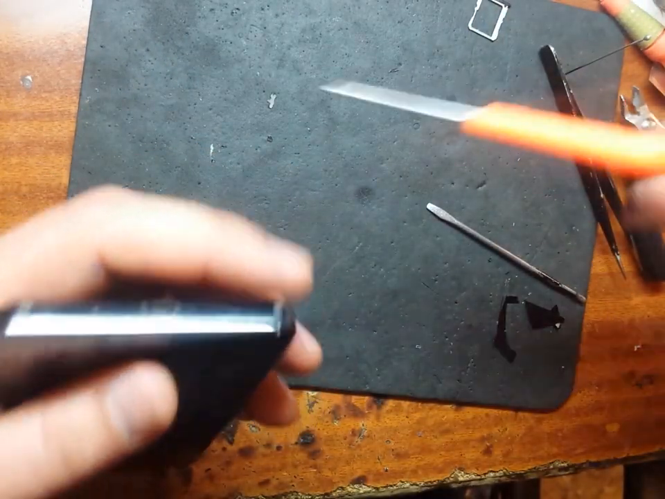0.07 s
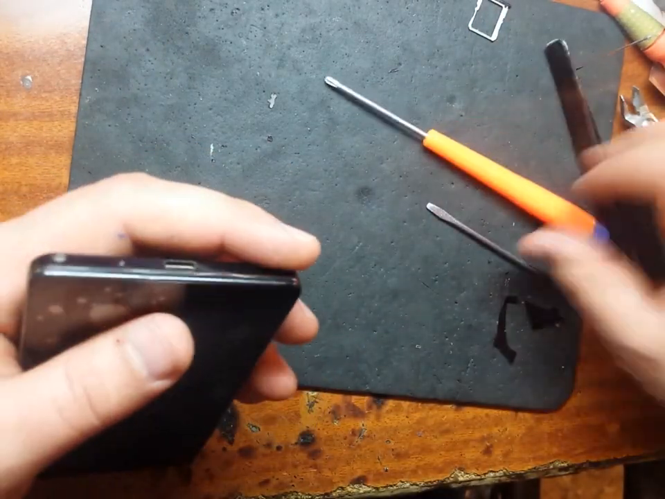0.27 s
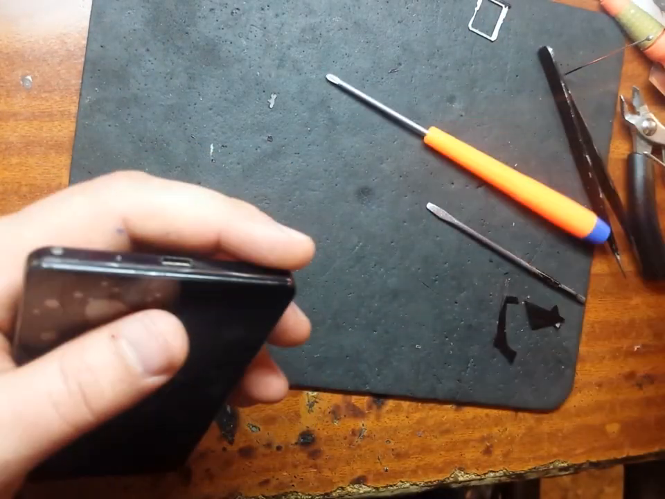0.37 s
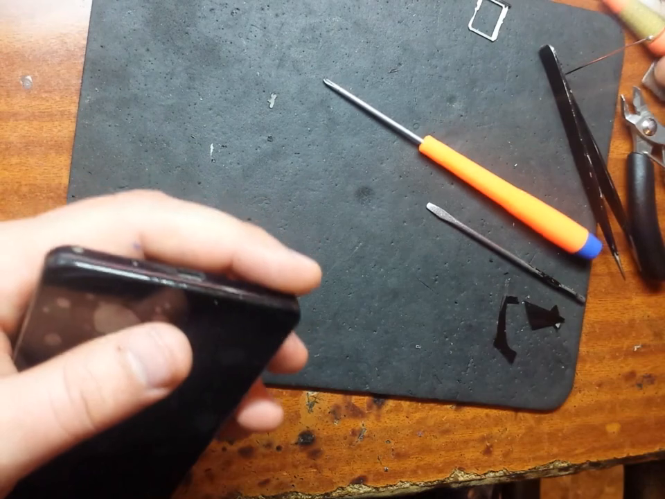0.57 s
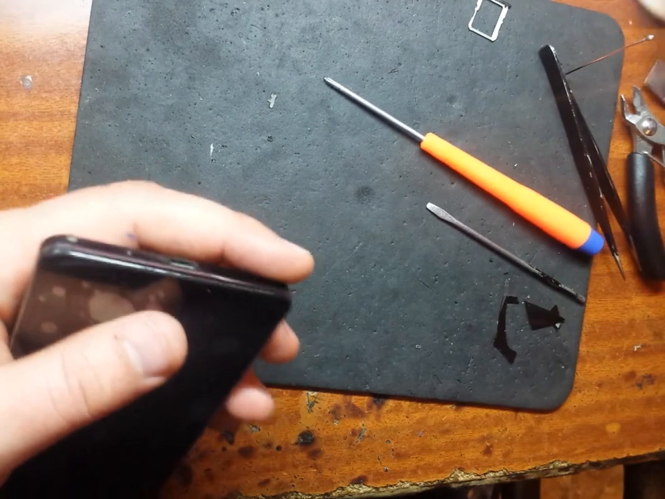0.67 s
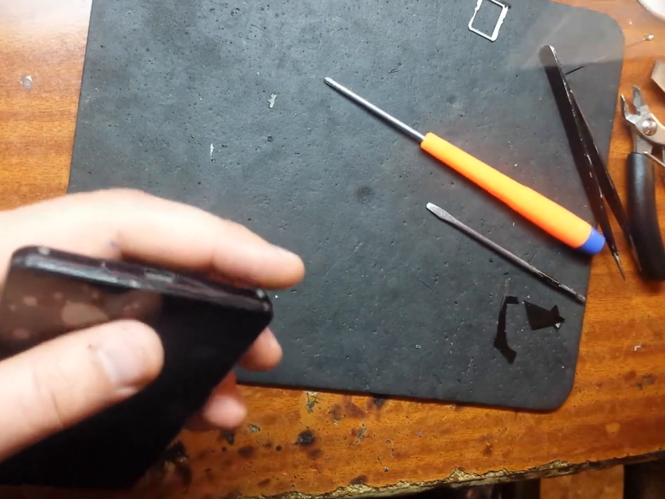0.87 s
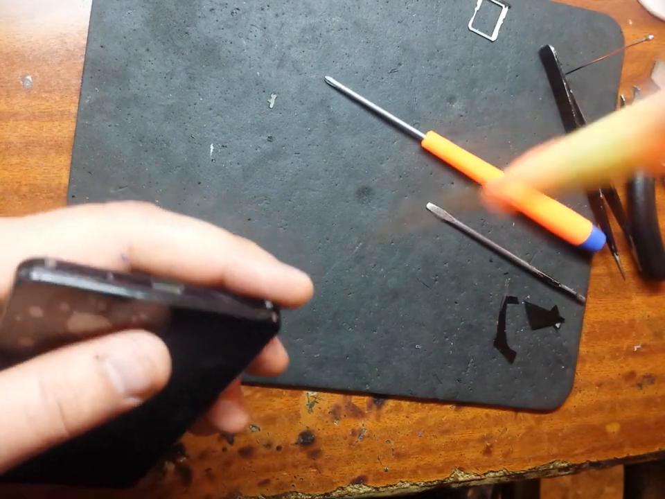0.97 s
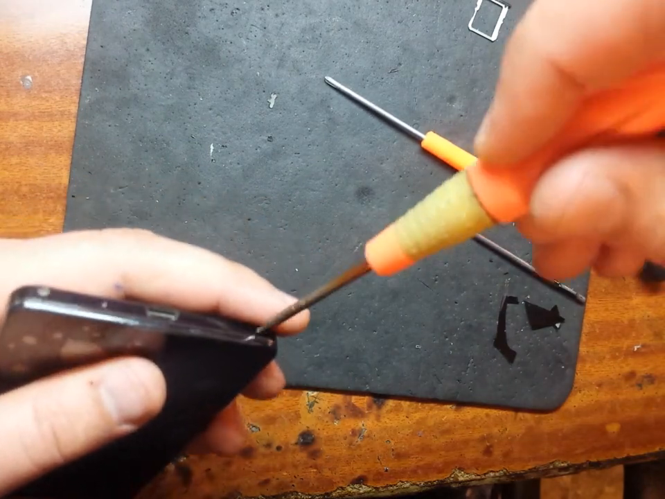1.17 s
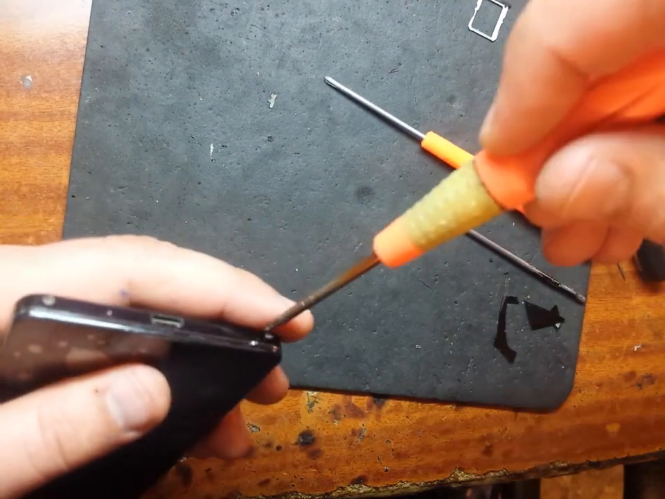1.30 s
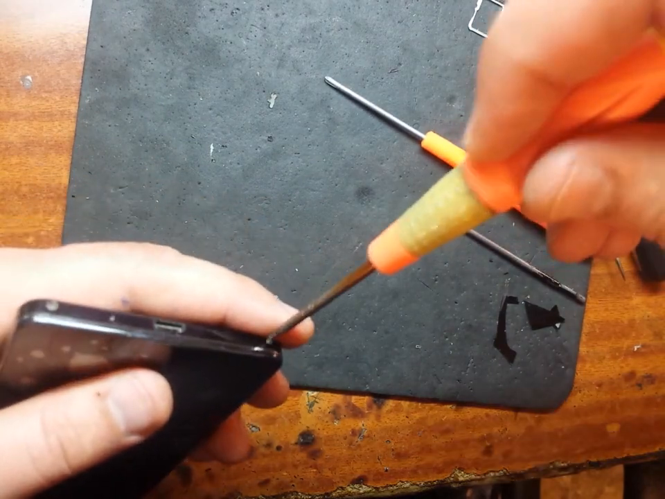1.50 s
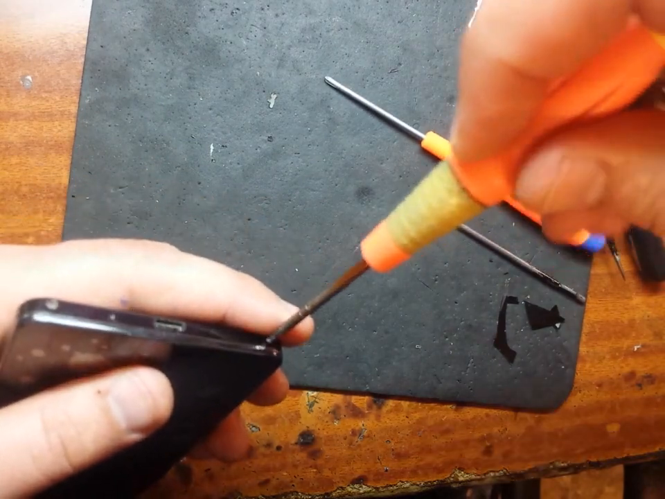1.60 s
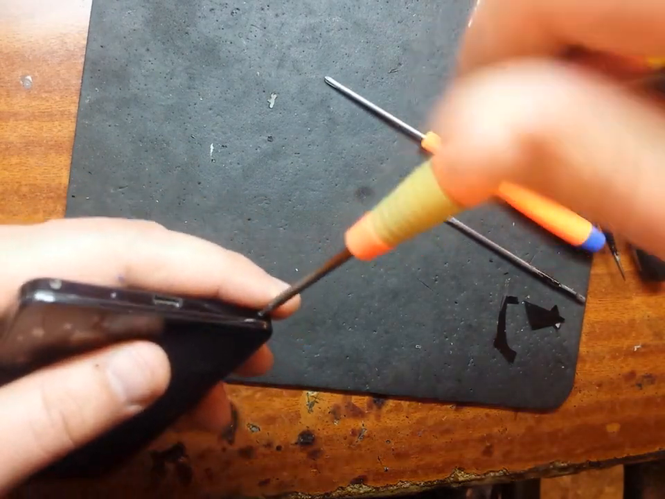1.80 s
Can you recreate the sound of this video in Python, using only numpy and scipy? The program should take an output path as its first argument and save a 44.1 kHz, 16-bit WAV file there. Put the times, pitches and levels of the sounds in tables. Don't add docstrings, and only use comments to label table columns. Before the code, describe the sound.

Small screwdrivers clatter on a rubber-matted wooden bench. Faint ticks lead to a bright steel tick at 0.23 seconds and a loud plastic clack with a soft thud at 0.33. After a lull, clacks, very sharp metallic snaps and short scrapes cluster from 0.6 to 0.78, then thick handle knocks at 0.8. Quiet room hiss remains, with tiny ticks near 1.25 and 1.75. Close, dry, small room.

```python
import sys
import numpy as np
from scipy import signal
from scipy.io import wavfile
from scipy.ndimage import uniform_filter1d, minimum_filter1d

SR = 44100
rng = np.random.default_rng(int(sys.argv[2]) if len(sys.argv) > 2 else 0)


def bounce(signal):
    frames = np.transpose(np.atleast_2d(signal))
    limited = np.clip(frames, -1, 1)
    pcm = np.round(limited * 32767).astype(np.int16)
    wavfile.write(sys.argv[1], SR, pcm)


def amplitude_ratio(level_db):
    exponent = np.asarray(level_db, float) / 20
    return 10 ** exponent


N = 81585

# start_s, peak_db, centre_khz, chatter_s
STEEL_HITS = [(0.0963,-30,5.8,0.003),(0.1673,-30,5.6,0.00087),(.226,-22.5,3.1,0.002),(0.2294,-10.5,8.7,0.0024),(0.2344,-22.5,5.3,0.0038),(0.293,-36.5,6.9,0.0027),(0.392,-25.5,6,0.0016),(0.542,-35,2,.003),(0.6958,-7,3.25,0.0025),(0.6985,-6.5,4.8,0.0026),(.7346,-15.5,4,0.002),(.924,-41,2.4,0.0016)]
# pitch_hz, level_db, t60_s (time to fall 60 dB)
STEEL_MODES = [(2430,-8,0.011),(3530,3,0.0095),(4020,0,0.016),(4750,-5.5,0.012),(5460,-4,0.012),(5890,0.5,0.022),(8700,4.5,0.0089),(10090,-1,0.0055),(11740,3,0.01),(12200,1,.006)]
# start_s, peak_db, centre_khz, chatter_s
HANDLE_HITS = [
    (.3264,-3,5,0.0037),
    (.328,-7.5,10.4,0.0015),
    (0.6043,-3,3.36,0.0083),
    (.609,-14,4.4,.004),
    (.613,-9,2.3,0.0086),
    (.617,-8,1.63,0.0071),
    (.635,-19.5,2,0.0027),
]
# pitch_hz, level_db, t60_s
HANDLE_MODES = [(350,12.5,0.037),(530,3,0.044),(744,-7.5,0.028),(1460,-1.5,0.022),(1637,-3,0.02),(2494,3,0.013),(2710,2,0.015),(3010,0.5,0.012),(3444,2,0.013),(4190,2,0.0078),(5480,-6,0.012),(5820,-11,0.023),(8750,-3.5,0.0057)]
# start_s, peak_db, centre_khz, chatter_s
GRIP_HITS = [
    (.7965,-14.5,1,0.0023),
    (.8018,-6.5,3.33,0.0047),
    (.8022,-11,.8,0.0032),
    (.8045,-10,1.36,0.0033),
    (.8294,-13,2.23,0.0034),
    (.831,-15.5,1.15,0.006),
    (.836,-24,0.66,0.008),
    (.848,-27,1,0.0053),
]
# pitch_hz, level_db, t60_s
GRIP_MODES = [(334,0.5,0.067),(380,-4,0.047),(545,2,0.095),(746,-0.5,0.06),(1092,-4.5,0.038),(1320,-0.5,0.041),(1630,-2.5,0.023),(1947,-7.5,0.031),(2220,-4.5,0.015),(2584,0.5,0.014),(3080,2.5,0.0082),(5500,-8,0.0074)]
# start_s, peak_db, centre_khz, chatter_s
TIP_HITS = [(0.3596,-19,8.1,0.0044),(.3695,-26,7,.004),(0.395,-21,6.9,.005),(0.6979,2,8.4,0.00092),(0.7325,-2.5,7.6,0.00063),(0.7504,-9,2.6,0.0025),(0.7629,-8.5,5.5,.0008),(.7665,-14,4.7,.003),(.772,-21,6.5,.002),(0.778,-24,4.7,0.0024),(1.035,-48,9,.003),(1.247,-29.5,11.3,0.0012),(1.593,-39,6.3,.005),(1.68,-44,9,.005),(1.745,-31.5,6,0.0022)]
# pitch_hz, level_db, t60_s
TIP_MODES = [(3270,-3,0.0057),(4020,8.5,0.0038),(5420,2.5,0.01),(5970,-3.5,0.0035),(7400,-7,.004),(8350,-1,0.003),(11940,-5.5,0.0069),(13400,2,0.0037)]

LEFT_RIGHT_DB = (8.1, 4.6, 4.6, 5.6)
CRACK_OVER_RING_DB = (0, 5.5, 1, 10)
CRACK_WIDTH_OCT = (0.99, 0.91, 1.05, 1.4)
AFTER_CONTACT_DB = (-1, -3.5, -4, -7.5)

# start_s, level_db, push_s
THUDS = [
    (0.228, -20, 0.0031),
    (.327, -19, 0.0023),
    (.334, -13.5, .002),
    (.738, -34, 0.0012),
    (0.614, -49, 0.0017),
    (0.803, -29.5, 0.00072),
]
# pitch_hz, level_db, t60_s
BENCH_MODES = [(99, -24, .15), (133, -6, 0.35), (170, -6.5, 0.16), (215, -7.5, .12), (328.5, -1, 0.168),
               (382.5, 1.5, 0.086), (732, 3, 0.044)]
# start_s, length_s, level_db, centre_khz, width_octaves
DRAGS = [
    (0.326,0.12,-32.5,4,1.24),
    (.357,0.02,-29.5,8.5,0.69),
    (.392,0.021,-41,6.9,1),
    (0.64,0.19,-33,1.42,1.35),
    (0.7335,0.063,-23.5,2.55,1.12),
    (0.82,0.11,-31.5,0.64,1.46),
    (0.8,0.039,-29,0.46,1.3),
    (.608,0.097,-35,1.55,1.28),
    (0.66,0.037,-35.5,0.29,1.03),
]
# start_s, length_s, level_db, centre_khz, width_octaves
RUBS = [
    (.53,.08,-43,8,1.4),
    (1.67,.15,-59,5.6,.45),
    (1.585,.03,-58,7,1.3),
    (.14,.05,-52,11,.8),
    (.692,.04,-37,2.2,1),
    (0.0005,.03,-44,7.5,.9),
]

# pitch_hz, t60_s
ROOM_DECAY = [(100,0.25),(500,0.28),(2000,0.25),(6000,0.2),(10000,0.052)]
# pitch_hz, level_db per hertz
TONE_SPECTRUM = [(30,-24),(58,-9),(130,-3),(420,-11.5),(1100,-13.5),(6000,-24),(9500,-39.5),(14400,-52.5)]
# pitch_hz, likeness (1 is identical)
TONE_LIKENESS = [(60, 0.98), (240, 0.99), (950, 0.2), (3770, -0.27), (15000, 0.35)]
# pitch_hz, lean_db
TONE_LEAN = [(60, -1), (180, 3.5), (550, 0.5), (1650, 1), (4970, 10), (15000, -13.5)]
# time_s, gain_db
GAIN = [(0,12),(.3,12),(.58,13),(.685,10.5),(.705,0.5),(.8,16),(.9,3),(1.05,0),(1.3,-0.2),(1.65,0.7),(1.75,4.5),(1.85,7)]
# pitch_hz, gain_db
LEFT_PORT = [(45,-34),(90,0.5),(4600,3),(5400,11),(6100,14),(7400,-0.5),(12000,-11),(15000,-19.5)]
RIGHT_PORT = [(45,-22),(300,4),(2000,-2),(5000,-1.5),(7000,5),(8600,-1.5),(11000,1.5),(15000,-6)]

CHATTER_PER_S, CRACK_DB, RING_OCT = 5500, -2.5, 1.096
DETUNE, PORT_SCATTER_DB = 0.015, 3
LONGEST_TURNS = 110
GRAINS_PER_S, GRAIN_DB = 8000, 2.5
DRAG_RISE, RUB_RISE = 0.01, 0.25
PORT_LAG_SAMPLES = 9
ROOM_DB, ROOM_LEAN_DB = -10.5, -0.5
TONE_DB = -49.5
CEILING_DB, AHEAD_S, DUCK = -6.5, 0.019, 0.4


def strike(modes, lean_db, snap_db, crack_oct, chatter_db, s, db, khz, chatter_s):
    t = np.arange(3000) / SR
    luck = rng.random((3000, 3)).T
    touches = luck[0] < CHATTER_PER_S / SR
    drive = touches * (2 * luck[1:] - 1) * amplitude_ratio(chatter_db - 20 * t / chatter_s)
    drive[:, 0] = 1

    off = rng.standard_normal((len(modes), 3))
    hz, mode_db, t60 = np.transpose(modes)
    decay = amplitude_ratio(-60 * t / np.minimum(t60, LONGEST_TURNS / hz)[:, None])
    waves = decay * np.sin(2 * np.pi * np.outer(hz * (1 + DETUNE * off[:, 0]), t))
    mode_db = mode_db + hump(khz, RING_OCT)(hz) + PORT_SCATTER_DB * off[:, 1:].T
    ring = (amplitude_ratio(mode_db) * (-1) ** np.arange(len(hz))) @ waves

    crack = colour(1.0 * (t == 0), hump(khz, crack_oct))
    one_touch = ring / abs(ring).max() + amplitude_ratio(CRACK_DB + snap_db) * crack / abs(crack).max()
    sound = signal.fftconvolve(drive, one_touch, axes=1)[:, :3000]
    return s, amplitude_ratio(db) * sound / abs(sound).max() * leaning(lean_db)


def thud(s, db, push_s):
    t = np.arange(16000) / SR
    ring = sum(amplitude_ratio(d - 60 * t / t60) * np.sin(2 * np.pi * hz * t) for hz, d, t60 in BENCH_MODES)
    push = t[:800] * np.exp(-t[:800] / (push_s / 3))
    return s, amplitude_ratio(db) * signal.fftconvolve(ring, push / push.sum())


def drag(s, length_s, db, khz, octaves, rise):
    t = np.arange(0, length_s, 1 / SR)
    luck = rng.random((9000, 6))[:len(t)].T
    slips = (luck[:2] < GRAINS_PER_S / SR) * np.sign(luck[2:4] - 0.5)
    grains = slips * amplitude_ratio(-GRAIN_DB * np.log(luck[4:] + 0.011))
    grains[1] += grains[0]
    stroke = np.minimum(t / (rise * length_s), 1) * (1 - t / length_s)
    return s, amplitude_ratio(db) * stroke * evened(colour(grains, hump(khz, octaves))) * leaning(5)


def room(x):
    taps = np.zeros((2, 20000))
    at = np.arange(80, 19980, 20) + rng.integers(0, 20, (2, 995))
    np.put_along_axis(taps, at, rng.choice([-1., 1.], at.shape), 1)
    hz, t, z = signal.stft(taps, SR, nperseg=256)
    decay = amplitude_ratio(-60 * t / read(ROOM_DECAY, hz)[:, None])
    tail = signal.istft(z * decay, SR, nperseg=256)[1]
    return signal.fftconvolve(x[None], tail / np.linalg.norm(tail[0]), axes=1)[:, :N]


def room_tone():
    frames, hz = N // 256 + 5, np.fft.rfftfreq(1024, 1 / SR)
    a, b, c, d, patches = rng.standard_normal((frames, 513, 5)).T
    patches = uniform_filter1d(patches, size=10, axis=0)
    patches = evened(uniform_filter1d(patches, size=12, axis=1))
    same = np.clip(read(TONE_LIKENESS, hz), -1, 1)[:, None]
    half_lean = read(TONE_LEAN, hz)[:, None] / 2
    left = a + 1j * b
    right = same * left + np.sqrt(1 - same ** 2) * (c + 1j * d)
    z = np.array([left * amplitude_ratio(half_lean), right * amplitude_ratio(-half_lean)])
    z = z * amplitude_ratio(read(TONE_SPECTRUM, hz)[:, None] + 0.45 * patches)
    noise = evened(signal.istft(z, nperseg=1024, noverlap=768)[1][:, :N])
    return noise * amplitude_ratio(TONE_DB + np.interp(np.arange(N) / SR, *np.transpose(GAIN)))


def colour(x, shape):
    hz = abs(np.fft.fftfreq(2048, 1 / SR))
    log_gain = np.log(amplitude_ratio(np.maximum(shape(hz), -80)))
    taps = np.fft.ifft(np.exp(np.conj(signal.hilbert(log_gain)))).real[:1024]
    return signal.fftconvolve(np.atleast_2d(x), taps[None], axes=1)[:, :x.shape[-1]]


def hump(khz, octaves):
    return lambda hz: -6 * (np.log2((hz + 1) / 1000 / khz) / octaves) ** 2


def leaning(db):
    return amplitude_ratio(np.array([[db / 2], [-db / 2]]))


def read(points, hz):
    f, value = np.transpose(points)
    return np.interp(np.log(hz + 1), np.log(f + 1), value)


def evened(x):
    return x / np.sqrt(np.mean(x ** 2) + 1e-20)


def add(mix, s, sound):
    part = mix[..., round(s * SR):][..., :sound.shape[-1]]
    part += sound[..., :part.shape[-1]]


def scene():
    tools, bench = np.zeros((2, N)), np.zeros(N)
    all_hits = (STEEL_HITS, HANDLE_HITS, GRIP_HITS, TIP_HITS)
    all_modes = (STEEL_MODES, HANDLE_MODES, GRIP_MODES, TIP_MODES)
    characters = zip(all_modes, LEFT_RIGHT_DB, CRACK_OVER_RING_DB, CRACK_WIDTH_OCT, AFTER_CONTACT_DB)
    for hits, character in zip(all_hits, characters):
        for hit in hits:
            add(tools, *strike(*character, *hit))
    for rise, strokes in ((DRAG_RISE, DRAGS), (RUB_RISE, RUBS)):
        for stroke in strokes:
            add(tools, *drag(*stroke, rise))
    for row in THUDS:
        add(bench, *thud(*row))

    tools[0] = np.roll(tools[0], PORT_LAG_SAMPLES)
    air = tools + room(tools.mean(0)) * amplitude_ratio(ROOM_DB) * leaning(ROOM_LEAN_DB)
    left = colour(air[0], lambda hz: read(LEFT_PORT, hz))[0]
    right = colour(air[1], lambda hz: read(RIGHT_PORT, hz))[0]
    bench = signal.sosfilt(signal.butter(3, 70, "highpass", fs=SR, output="sos"), bench)
    return np.array([left, right]) + bench * leaning(1.2) + room_tone()


def top_cut(x):
    return signal.sosfilt(signal.butter(12, 15400, fs=SR, output="sos"), x)


def record(dry):
    over_db = np.maximum(20 * np.log10(abs(dry).max(0) + 1e-9) - CEILING_DB, 0)
    span = round(AHEAD_S * SR) // 2 * 2
    held = np.roll(-minimum_filter1d(-over_db, span), -span // 2)
    ducked = dry * amplitude_ratio(-DUCK * uniform_filter1d(held, span // 2))
    bass_cut = signal.butter(2, 45, "highpass", fs=SR, output="sos")
    return top_cut(signal.sosfilt(bass_cut, np.clip(ducked, -1, 1)))


dry = scene()
out = record(dry)
bounce(out)
```